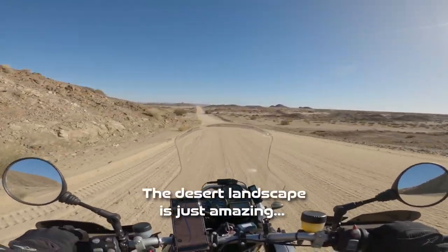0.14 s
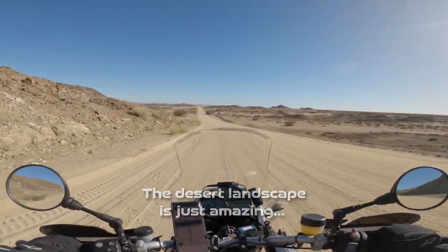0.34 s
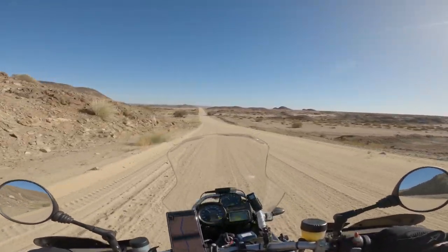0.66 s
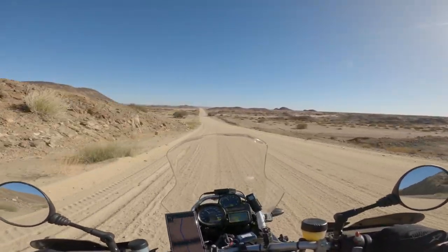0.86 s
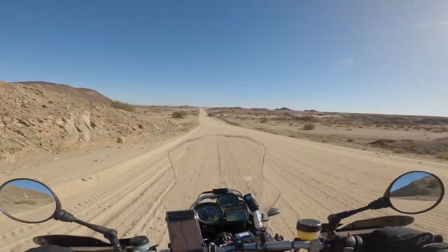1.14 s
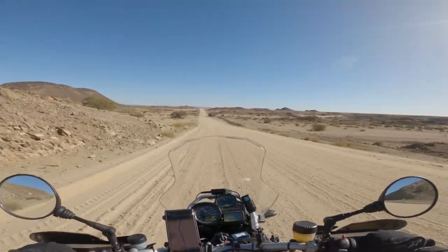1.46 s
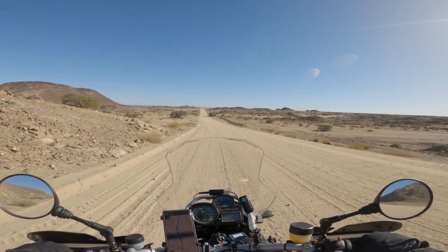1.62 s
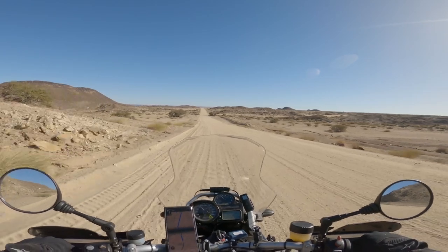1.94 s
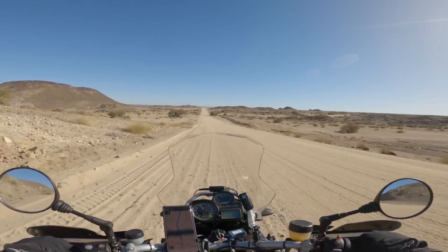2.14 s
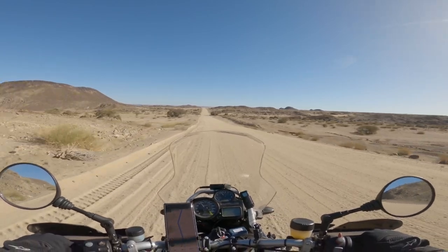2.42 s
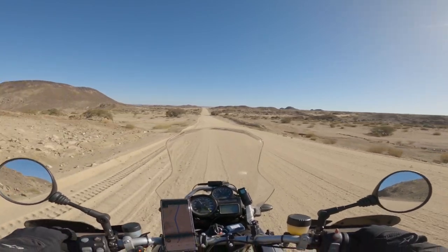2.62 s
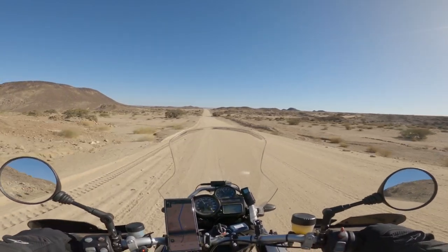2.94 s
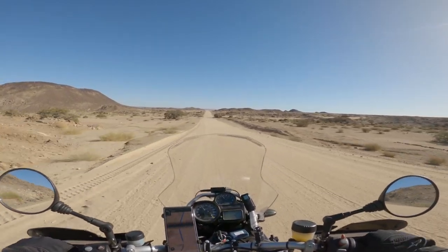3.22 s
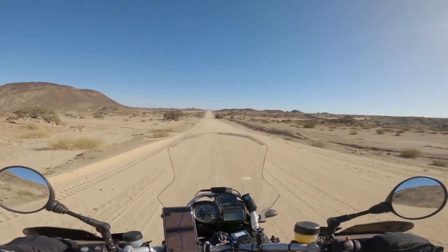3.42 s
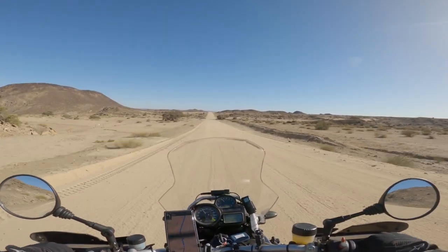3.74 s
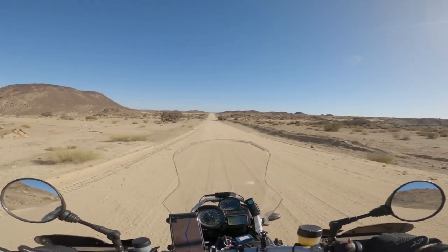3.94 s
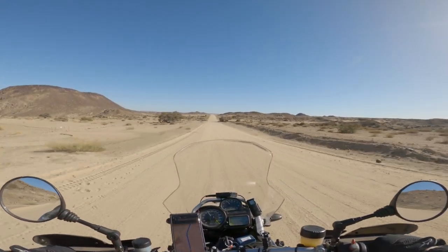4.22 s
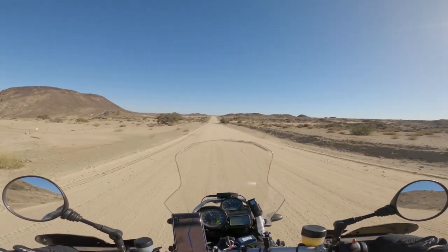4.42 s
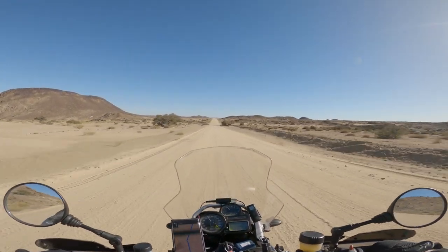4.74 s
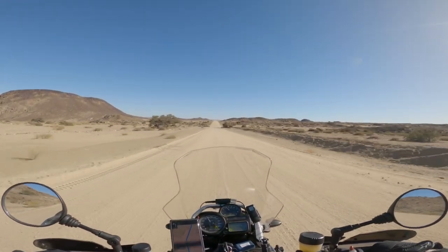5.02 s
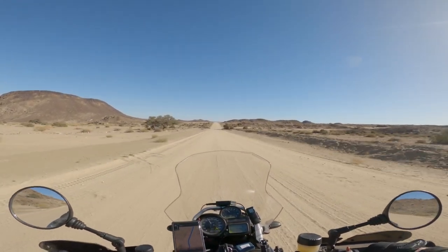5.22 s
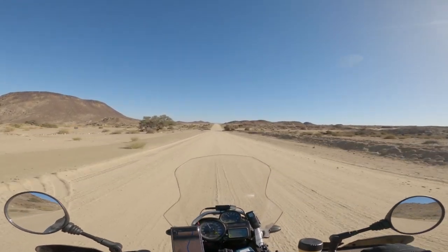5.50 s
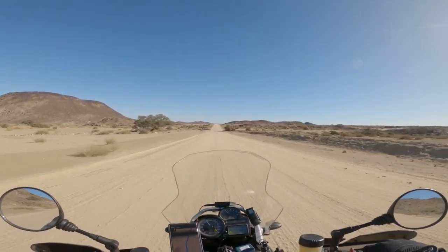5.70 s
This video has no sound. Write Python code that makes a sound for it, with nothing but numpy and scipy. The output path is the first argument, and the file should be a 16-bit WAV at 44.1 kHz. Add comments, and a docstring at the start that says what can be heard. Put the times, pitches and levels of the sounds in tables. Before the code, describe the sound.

Wind roars and flutters on a rider's helmet microphone, with a low throb and dull pops, as a motorcycle cruises along a sandy gravel road. The engine drones faintly underneath and grit ticks lightly. A few ruts give short knocks. Past halfway the wind breaks into rougher buffets and a thin gear whine rises. Near the end, loose gravel churns under the tyres and pebbles clack against the bike.

```python
"""A motorcycle cruises on a sandy gravel road, heard from the rider's helmet.
From the start, eddies shed by the windscreen throb on the microphone and make the wind's roar and hiss
flutter; the engine drones faintly underneath and the tyres throw up grit. Between 1 and 3 s the bike
jolts over ruts. Past halfway the air turns rougher and the throb breaks into buffets. From about 5 s
looser gravel churns under the tyres and pebbles clack against the bike."""
import sys
import numpy as np
from scipy.fft import rfft, irfft, next_fast_len
from scipy.io import wavfile
from scipy.ndimage import uniform_filter1d, minimum_filter1d, map_coordinates

SR = 44100
rng = np.random.default_rng(int(sys.argv[2]) if len(sys.argv) > 2 else 0)


def materialize(psi):
    """Save the field psi as 16-bit PCM at rate SR to the path in sys.argv[1].

    A 1-D psi becomes a single channel; in a 2-D psi each row is a channel.
    """
    bounded = np.clip(np.atleast_2d(psi).T, -1, 1)
    quanta = np.round(bounded * 32767).astype(np.int16)
    wavfile.write(sys.argv[1], SR, quanta)


N = 258867

# low, middle and high bands of noise: (frequency [Hz], relative level [dB])
ROAR_SPECTRUM = [(60, -30), (130, -2.5), (190, 0), (290, 1.5), (335, -1.5), (410, 1), (560, -1), (720, -9),
                 (950, -15), (1300, -21.5), (1650, -28.5), (2300, -37.5), (6000, -95)]
RUSH_SPECTRUM = [(800, -43), (1400, 3.5), (1750, -1), (2300, 1), (2700, 0), (3200, -4.5), (3900, -9.5),
                 (4700, -20.5), (7000, -42), (12000, -81)]
HISS_SPECTRUM = [(2500, -45), (4200, 0.5), (5200, 1), (5900, 0), (6400, -0.5), (6900, -1.5), (8000, -3),
                 (10000, -7.5), (12000, -15), (12800, -19), (13400, -19), (15700, -26)]
# eddies off the windscreen, regular and broken: (time [s], throb level [dB], buffet level [dB])
EDDY_LEVELS = [(0, -18, -14), (.4, -18.5, -19), (.6, -9.5, -19), (.95, -16.5, -17), (1.7, -11, -21),
               (2.4, -13, -19.5), (2.9, -13, -22), (3.1, -18.5, -15.5), (3.35, -15.5, -22.5),
               (3.75, -22, -13.5), (4.7, -17.5, -15), (5.3, -18.5, -14.5), (5.87, -23, -13.5)]


def amp(db):
    """Decibels to gain."""
    return 10 ** (np.asarray(db) / 20)


def unit(x):
    """x at rms 1."""
    return x / np.sqrt(np.mean(x ** 2) + 1e-20)


def curves(rows):
    """One value per sample for each column after the time."""
    times, *columns = np.transpose(rows)
    return [np.interp(np.arange(N) / SR, times, column) for column in columns]


def wobble(rate):
    """A smooth random curve at rms 1, rate knots a second."""
    knots = rng.standard_normal(int(N * rate / SR) + 4)
    return unit(map_coordinates(knots, [np.arange(N) * rate / SR]))


def filtered(x, response):
    """x through a filter whose gain is response(frequency)."""
    size = next_fast_len(N + SR // 2)
    return irfft(rfft(x, size) * response(np.fft.rfftfreq(size, 1 / SR)), size)[:N]


def coloured(x, spectrum):
    """x shaped by (Hz, dB) points on a log axis, at rms 1."""
    hz, db = np.transpose(spectrum)
    return unit(filtered(x, lambda f: amp(np.interp(np.log(f + 1), np.log(hz), db))))


def steady(x, seconds):
    """x with its swells slower than the given time evened out."""
    return x / np.sqrt(np.abs(uniform_filter1d(x ** 2, int(seconds * SR))) + 1e-9)


def turbulence(spectrum, burst_db, burst_rate):
    """Noise that comes in brief random bursts, as turbulent air does."""
    return coloured(amp(burst_db * wobble(burst_rate)) * rng.standard_normal(N), spectrum)


def scattered(start_s, per_s, db, scatter_db=2):
    """Up to 64 chance events, one in each slot of 1 / per_s seconds: (time [s], peak level [dB])."""
    chance = rng.random((64, 2))
    times = start_s + (np.arange(len(chance)) + chance[:, 0]) / per_s
    levels = db + scatter_db * np.sqrt(3) * (2 * chance[:, 1] - 1)
    return [(s, level) for s, level in zip(times, levels) if s < N / SR]


def whistle(waver_db):
    """Air over an edge of the helmet sings in two thin, breathy tones that come and go."""
    # the whistle's envelope: (time [s], level [dB])
    envelope = [(0, -80), (.35, -76), (.5, -71), (.57, -75), (.68, -69), (.85, -75), (1.3, -78), (2.8, -86),
                (3.7, -78), (4.2, -73), (4.55, -73), (4.7, -80), (5.87, -77)]
    # edge tones: (frequency [Hz], width [Hz], relative level [dB])
    tones = [(6300, 320, 0.5), (13380, 380, -11)]
    level_db, = curves(envelope)
    out = np.zeros(N)
    for hz, width, db in tones:
        gain = amp(db + waver_db * wobble(35))
        breath = filtered(rng.standard_normal(N), lambda f: 1 / (1 + ((f - hz) / (width / 2)) ** 2))
        out += gain * unit(breath)
    return amp(level_db) * out


def stone_hits(events, pitch_hz, spread, t60_s, modes=30, attack_s=0.00087):
    """Each stone rings briefly in a dense cluster of modes around its own pitch, the higher ones weaker."""
    out, t = np.zeros(N + SR), np.arange(SR // 20) / SR
    envelope = amp(-60 * t / t60_s) * (1 - np.exp(-t / attack_s))
    for s, db in events:
        hz = pitch_hz * np.exp(0.05 * rng.standard_normal())
        ratio = np.exp(spread * rng.uniform(-0.686, 1.3, (modes, 1)))
        partials = np.sin(2 * np.pi * (hz * ratio * t + rng.random((modes, 1)))) / ratio ** 2
        ring = envelope * partials.sum(axis=0)
        out[round(s * SR):][:len(t)] += amp(db) * ring / np.abs(ring).max()
    return out[:N]


def flying_stones(loose_from_s):
    """Pebbles clack on the bike and grit ticks on the fairing; looser gravel throws up more of both."""
    # the standout pebble and grit hits: (time [s], peak level [dB])
    clacks = [(2.673, -38), (4.4775, -28), (4.9562, -38), (5.025, -30), (5.089, -31), (5.1422, -29),
              (5.27, -31), (5.315, -25.5), (5.3558, -29), (5.428, -29), (5.458, -27), (5.473, -27),
              (5.496, -30), (5.53, -29), (5.546, -31), (5.6195, -29), (5.6461, -29), (5.8117, -33)]
    ticks = [(1.2087, -50), (2.5796, -48), (3.9465, -42), (4.141, -47), (4.3456, -45), (4.7531, -48),
             (5.3555, -40), (5.459, -43), (5.5089, -43), (5.5309, -41), (5.5648, -41)]
    stray_grit = scattered(0, per_s=8, db=-53)
    loose_pebbles = scattered(loose_from_s, per_s=36, db=-38.5)
    loose_grit = scattered(loose_from_s, per_s=36, db=-51)
    pebbles = stone_hits(clacks + loose_pebbles, pitch_hz=2650, spread=0.316, t60_s=0.018)
    grit = stone_hits(ticks + stray_grit + loose_grit, pitch_hz=7570, spread=0.42, t60_s=0.012)
    return pebbles + grit


def jolts(rattle_db, attack_s=0.0026, t60_s=0.063):
    """Each rut shakes the fairing: a sharp knock that dies away in a rattle."""
    # knocks from the ruts: (time [s], level the decay starts from [dB])
    ruts = [(1.148, -32), (1.822, -32), (2.423, -25), (2.667, -30), (2.763, -33)]
    # the fairing's rattle: (frequency [Hz], relative level [dB])
    spectrum = [(200, -15), (600, 3), (1000, 1.5), (1700, -11), (3000, -11.5), (4500, -25), (9000, -33),
                (14000, -55)]
    shake, t = np.zeros(N + SR), np.arange(SR // 8) / SR
    for s, db in ruts:
        shake[round(s * SR):][:len(t)] += amp(db - 60 * t / t60_s) * (1 - np.exp(-t / attack_s))
    return shake[:N] * steady(turbulence(spectrum, burst_db=rattle_db, burst_rate=500), seconds=0.02)


def tyres(gust_db, loose_from_s, loose_rise_s=0.21):
    """The tread hums unsteadily, sand and crunch swell with the wind, and loose gravel churns in clumps."""
    # tread blocks' hum, rising as the bike gathers speed: (time [s], pitch [Hz], level [dB])
    tread = [(0, 276.6, -31), (2.1, 290.9, -37), (3.9, 308.1, -31.5), (4.5, 312, -40), (5.87, 311.5, -49)]
    # churning gravel: (frequency [Hz], relative level [dB])
    churn_spectrum = [(250, -22), (650, 6.5), (900, 2), (1300, -5.5), (1800, -20), (2800, -15), (3600, -22),
                      (5000, -34), (9000, -70)]
    tread_hz, tread_db = curves(tread)
    phase = 2 * np.pi * np.cumsum(tread_hz + 12 * wobble(50)) / SR
    hum = amp(tread_db) * unit(np.sin(phase) * amp(0.81 * wobble(24.55)))
    grains = lambda per_s: (rng.random(N) < per_s / SR) * rng.standard_normal(N)
    sand = amp(-68.5 + gust_db) * coloured(grains(300), HISS_SPECTRUM)
    crunch = amp(-55 + gust_db) * coloured(grains(260), RUSH_SPECTRUM)
    looseness = np.clip((np.arange(N) / SR - loose_from_s) / loose_rise_s, 0, 1)
    clumps = grains(1200) * amp(5.5 * wobble(45))
    churn = amp(-34) * looseness * coloured(clumps, churn_spectrum)
    return hum + sand + crunch + churn


def engine(unevenness_db, gear_order=25):
    """The exhaust drones on multiples of the firing rate, and the gears whine under load."""
    # the engine at cruise: (time [s], firing rate [Hz], exhaust level [dB], gear whine level [dB])
    cruise = [(0, 55.25, -28.5, -54), (.9, 55.6, -33.5, -53), (1.6, 56.4, -38, -57),
              (2.2, 57.6, -41.5, -59), (2.9, 56.53, -27.5, -59), (3.7, 51.93, -32, -45),
              (4.2, 53.3, -28.5, -42), (4.6, 54.02, -29, -42.5), (5.3, 53.36, -36, -50),
              (5.87, 53.8, -34, -57)]
    # exhaust note: (multiple of the firing rate, relative level [dB])
    harmonics = [(1, -8.5), (2, -2.5), (3, -8), (4, -13), (8, -12.5)]
    firing_hz, exhaust_db, whine_db = curves(cruise)
    phase = 2 * np.pi * np.cumsum(firing_hz * (1 + 0.00414 * wobble(10))) / SR
    drone = sum(amp(db + unevenness_db * wobble(8)) * np.sin(k * phase + rng.uniform(0, 2 * np.pi))
                for k, db in harmonics)
    whine = np.sin(gear_order * phase + 0.89 * wobble(110)) * amp(2.9 * wobble(24.96))
    return amp(exhaust_db) * unit(drone) + amp(whine_db) * unit(whine)


def rumble():
    """The helmet's wake rumbles, swelling and easing."""
    # the wake's swells: (time [s], level [dB])
    envelope = [(0, -33), (.25, -25), (.65, -31), (1.05, -26.5), (1.35, -32.5), (1.55, -26), (1.8, -39),
                (2.9, -35), (3.6, -29.5), (3.95, -23.5), (4.2, -31), (4.45, -23.5), (4.7, -26.5),
                (5.05, -24), (5.5, -30), (5.87, -27)]
    # its deep tone colour: (frequency [Hz], relative level [dB])
    spectrum = [(35, -22), (62, -2), (85, 1.5), (110, -0.5), (150, -9), (260, -27.5), (600, -72)]
    level_db, = curves(envelope)
    return amp(level_db) * steady(coloured(rng.standard_normal(N), spectrum), seconds=0.13)


def bursts(events, ring_hz, decay_s, fray):
    """Each bursting eddy is a dull pop of a cycle or two, frayed by the roar inside it."""
    out, t = np.zeros(N + SR), np.arange(SR // 10) / SR
    roar = np.pad(coloured(rng.standard_normal(N), ROAR_SPECTRUM), (0, SR))
    envelope = (t / decay_s) ** 2 * np.exp(-t / decay_s)
    for (s, db), (detune, offset) in zip(events, rng.standard_normal((len(events), 2))):
        start = round(s * SR)
        swing = np.sin(2 * np.pi * ring_hz * np.exp(0.095 * detune) * t + np.pi * offset)
        pop = envelope * (swing + fray * roar[start:][:len(t)])
        out[start:][:len(t)] += amp(db) * pop / np.abs(pop).max()
    return out[:N]


def eddy_slaps():
    """Big eddies thump the helmet and small ones pop on it, the weakest by chance."""
    # eddies that strike the helmet: (time [s], peak level [dB])
    big_eddies = [(0.939, -15), (1.881, -12), (3.087, -12), (3.135, -14), (3.777, -8), (3.953, -9),
                  (4.34, -12.5), (4.472, -11), (5.306, -8.5)]
    small_eddies = [(0.095, -12.5), (0.228, -15), (0.411, -6.5), (0.813, -12), (0.864, -15), (1.15, -6),
                    (1.217, -10), (1.87, -12), (2.424, -8.5), (2.465, -11.5), (2.491, -13), (2.668, -7.5),
                    (2.719, -11), (2.978, -10), (3.188, -11), (3.321, -12.5), (3.502, -10.5),
                    (3.676, -11.5), (3.823, -11.5), (4.011, -9.5), (4.244, -14), (4.111, -6), (4.287, -9.5),
                    (4.416, -12), (4.92, -6.5), (5.081, -18), (5.463, -14), (5.597, -12), (5.818, -12)]
    weak_eddies = scattered(0, per_s=2, db=-17.5, scatter_db=0.5)
    thumps = bursts(big_eddies, ring_hz=113, decay_s=0.0039, fray=0.26)
    pops = bursts(small_eddies + weak_eddies, ring_hz=479, decay_s=0.00099, fray=0.76)
    return thumps + pops


def surges():
    """Brief surges and lulls of the air, in dB for the roar, its bright top and the hiss."""
    # lulls are negative: (time [s], half length [s], roar [dB], bright top [dB], hiss [dB])
    swells = [(0.423, 0.045, 2.5, -14, 1), (0.523, 0.083, 2, 3, 0), (0.596, .03, -7.5, -1, -1),
              (0.656, .035, 3.5, 4, 1), (0.688, .02, -0.5, 0, -5), (1.127, .05, 2, -4, -1),
              (1.56, .04, 0.5, 3, -0.5), (1.695, .02, -1, -2, -4), (1.847, .02, -1, -3, -7),
              (1.908, 0.022, -4.5, -2, -3), (2.08, 0.027, -3, 0, -1), (2.15, .02, 1.5, 0, 2.5),
              (2.405, .02, -4, -8, -5), (2.477, 0.018, 0.5, 7, -2), (2.738, .02, -1, 0, -3),
              (2.855, .025, 1, -3, -5), (2.939, 0.039, -0.5, -1, 0), (3.164, 0.028, -6, -1, -1),
              (3.441, 0.042, -2, 3, -1), (3.49, .025, -2, -1, -4), (3.743, 0.027, -3, 8, 1.5),
              (3.8, 0.063, 1.5, -4, 0), (4.35, 0.12, 1.5, 0, 2), (4.48, 0.021, 5, 0, 2),
              (4.898, 0.11, 2, 2, 0), (5.026, 0.054, 4, 5.5, 1), (5.385, .05, -4, 2.5, 0),
              (5.46, 0.027, 1, 5, 2), (5.687, 0.041, 1.5, 5.5, 1)]
    t = np.arange(N) / SR
    bump = lambda s, half_s: np.cos(np.pi / 2 * np.clip((t - s) / half_s, -1, 1)) ** 2
    return sum(np.outer(levels, bump(s, half_s)) for s, half_s, *levels in swells)


def wind(gust_db, pressure):
    """Gusts lift and brighten the wind; it flutters as air speeds up in each eddy's low-pressure core."""
    # the roar's bright top: (frequency [Hz], relative level [dB])
    top_spectrum = [(400, -21), (750, -0.5), (1050, 1), (1330, -0.5), (1650, -14), (2500, -41), (6000, -90)]
    speed = -unit(np.tanh(0.6 * steady(pressure, seconds=0.8)))
    throb_db, _ = curves(EDDY_LEVELS)
    flutter = speed * amp(0.4 * (throb_db - throb_db.mean()))  # deeper when the throb is strong
    flicker = unit(np.tanh(wobble(130)))  # fine turbulence, common to all pitches
    roar_surge, top_surge, hiss_surge = surges()
    roar = amp(0.58 * speed + 0.51 * flicker) * turbulence(ROAR_SPECTRUM, burst_db=3.0, burst_rate=400)
    top = amp(0.86 * speed + 0.51 * flicker) * turbulence(top_spectrum, burst_db=1.5, burst_rate=550)
    rush = amp(flutter + flicker) * turbulence(RUSH_SPECTRUM, burst_db=0.96, burst_rate=620)
    hiss = amp(1.2 * flutter + 0.85 * flicker) * coloured(rng.standard_normal(N), HISS_SPECTRUM)
    # (noise, level [dB], growth [dB per dB of gust])
    layers = [(roar, -22.5 + roar_surge, 0.56), (top, -37 + top_surge, 0.82),
              (rush, -44 + 0.67 * hiss_surge, 0.75), (hiss, -59 + hiss_surge, 0.67)]
    return sum(amp(db + growth * gust_db) * steady(noise, seconds=0.11) for noise, db, growth in layers)


def buffeting(shed_hz, wander_hz, swell_db=4):
    """Nearly regular eddies off the windscreen throb on the helmet; rough air breaks them into buffets."""
    # broken buffets: (frequency [Hz], relative level [dB])
    spectrum = [(4, -21), (10, -0.5), (25, -0.5), (33, -0.5), (42, -3), (56, -4.5), (72, -11.5), (100, -14),
                (140, -18), (220, -29), (500, -45), (1000, -120)]
    throb_db, buffet_db = curves(EDDY_LEVELS)
    phase = 2 * np.pi * np.cumsum(shed_hz + wander_hz * wobble(21.97)) / SR
    swell = np.tanh(wobble(9.3))  # the eddies form and fall apart again
    throb = unit(np.sin(phase) * amp(swell_db * swell))
    buffets = steady(turbulence(spectrum, burst_db=-0.5, burst_rate=34), seconds=0.18)
    return amp(throb_db) * throb + amp(buffet_db) * buffets


def scene():
    """Wind in front; engine, tyres and flying stones behind it."""
    # the air past the helmet: (time [s], gust strength [dB])
    gusts = [(0.0, 2.5), (0.22, -1), (0.48, 2.5), (0.8, -2.5), (1.13, 0.3), (1.33, -2.5), (1.58, 1),
             (2.03, -2.9), (2.35, -1.8), (3.45, -1.2), (3.85, 2), (4.45, 2), (4.7, 1.3), (4.95, 1.5),
             (5.45, 2.5), (5.87, 2)]
    gust_db, = curves(gusts)
    loose_from_s = 4.8  # the bike reaches looser gravel
    pressure = buffeting(shed_hz=18.4, wander_hz=1.77)
    air = pressure + wind(gust_db, pressure) + rumble() + whistle(waver_db=2.2)
    bike = engine(unevenness_db=3.5) + tyres(gust_db, loose_from_s)
    return (air + eddy_slaps() + bike + jolts(rattle_db=1.0) + flying_stones(loose_from_s))[None]


def record(dry):
    """A limiter eases the strongest buffets, and a steep low-pass cuts the highest treble."""
    ceiling, top_hz, fade_s = 0.85, 15700, 0.002
    needed_gain = np.minimum(1, ceiling / (np.abs(dry[0]) + 1e-9))
    gain = uniform_filter1d(minimum_filter1d(needed_gain, size=SR // 100), size=SR // 100)
    fade_out = np.minimum(1, np.arange(N)[::-1] / (SR * fade_s))
    return filtered(fade_out * gain * dry[0], lambda hz: hz < top_hz)[None]


dry = scene()
out = record(dry)
materialize(out)
```